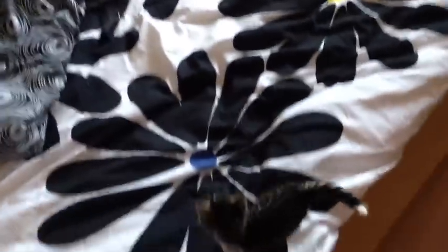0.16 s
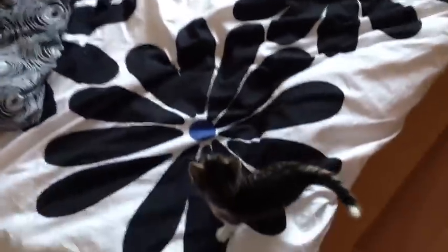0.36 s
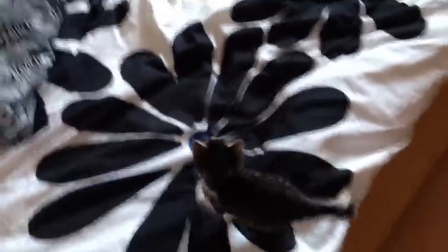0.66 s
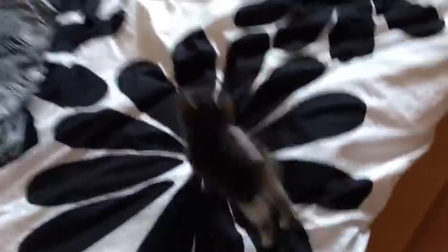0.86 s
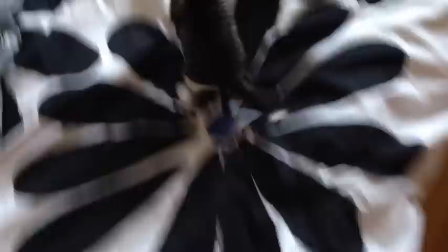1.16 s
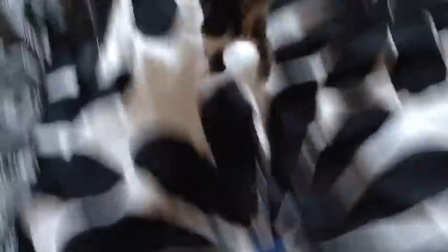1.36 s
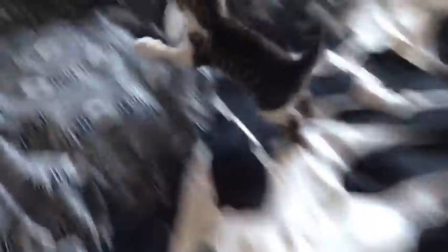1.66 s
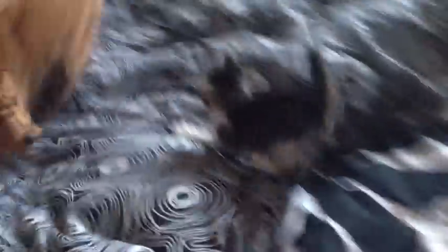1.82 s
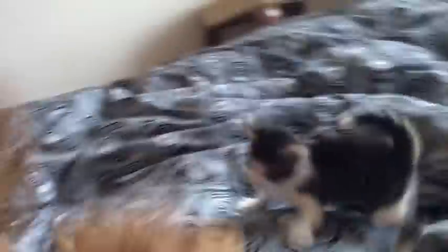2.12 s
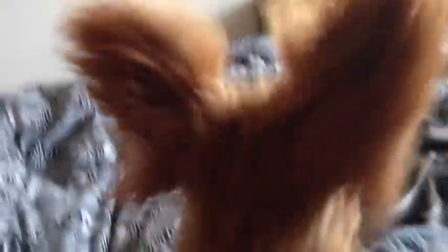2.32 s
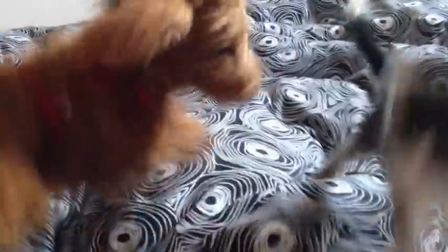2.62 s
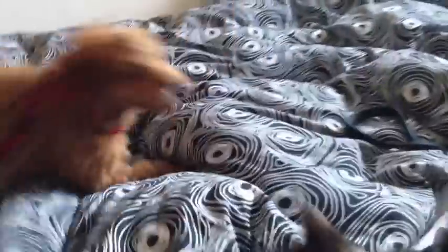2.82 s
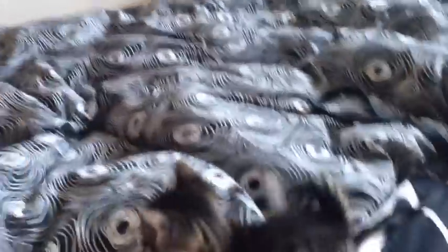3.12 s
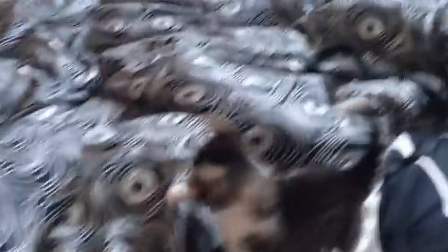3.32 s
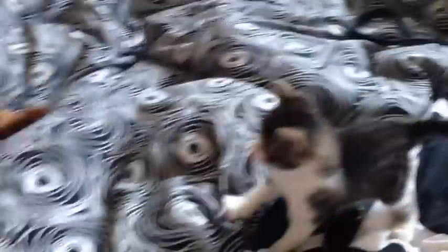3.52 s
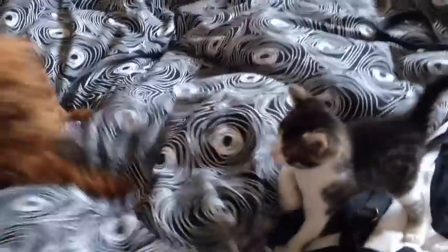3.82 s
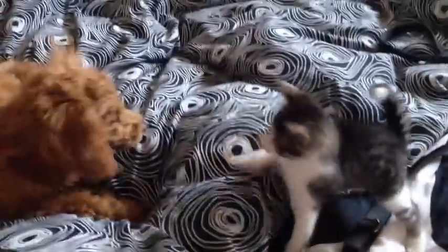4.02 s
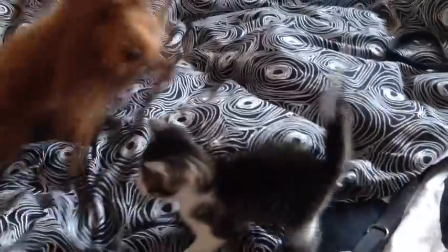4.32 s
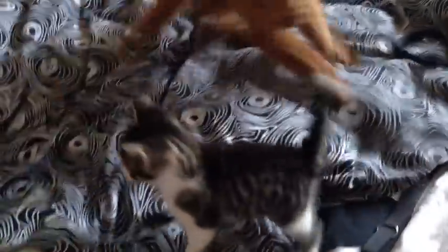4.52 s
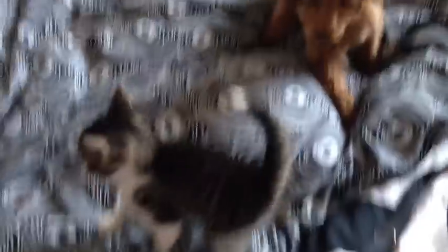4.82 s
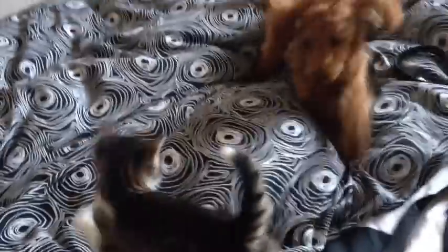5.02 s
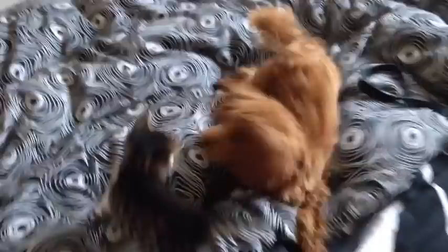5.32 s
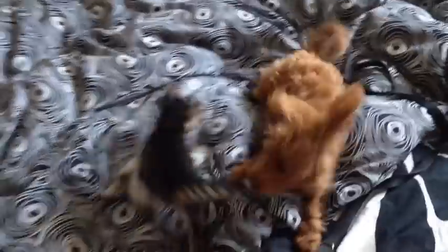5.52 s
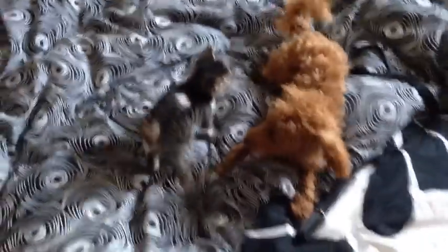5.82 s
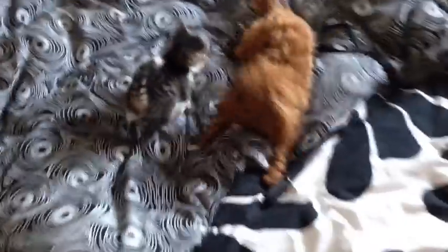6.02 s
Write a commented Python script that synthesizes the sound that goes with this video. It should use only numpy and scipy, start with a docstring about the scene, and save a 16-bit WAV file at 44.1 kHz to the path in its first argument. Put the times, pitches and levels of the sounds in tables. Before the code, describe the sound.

Close rustling of bedding and muffled pats open the scene, as a small dog and a kitten move over a duvet and knock a hard object. Heavier pounces follow, thumping the mattress while fur swishes and claws snap free of the cloth. The play softens, with a light clink, more clusters of paw landings and one brighter clink. A nearby phone picks it up with faint hiss and slight bedroom reverberation.

```python
"""A quiet bedroom, where a small dog and a kitten tumble on a bed close to a phone. Over a faint hiss,
fur and paws drag across the duvet: stick-slip friction rumbles in the padding and rasps on the cloth.
Paws land as damped thuds and pats, the heaviest heave the mattress, and claws snap free of the cloth.
Now and then two hard things are knocked and ring in their modes; the last clink has a bright attack.
The room answers each impact softly."""
import sys
import numpy as np
from scipy import signal
from scipy.fft import rfft, irfft, next_fast_len
from scipy.io import wavfile
from scipy.ndimage import uniform_filter1d, map_coordinates

SR = 44100
rng = np.random.default_rng(int(sys.argv[2]) if len(sys.argv) > 2 else 0)


def to_wav(s):
    """Save 16-bit WAV."""
    ch = np.atleast_2d(s).T  # columns
    pcm = np.round(np.clip(ch, -1, 1) * 32767)  # PCM
    wavfile.write(sys.argv[1], SR, pcm.astype(np.int16))


N = 271656


def amp(db):
    """Amplitude ratio of a level in decibels."""
    return 10 ** (np.asarray(db) / 20)


def unit(x):
    """Normalisation to rms 1."""
    return x / np.sqrt(np.mean(x ** 2) + 1e-20)


def along(points, hz):
    """Interpolation of (frequency, value) points on a logarithmic frequency axis."""
    f, values = np.transpose(points)
    return np.interp(np.log(hz + 1), np.log(f + 1), values)


def filtered(x, response):
    """Linear filtering: the spectrum is multiplied by a complex frequency response."""
    size = next_fast_len(len(x) + 8192)
    return irfft(rfft(x, size) * response(np.fft.rfftfreq(size, 1 / SR)), size)[:len(x)]


def resonance(centre_hz, width_hz):
    """Frequency response of a damped oscillator, with peak gain 1."""
    return lambda f: 1j * f * width_hz / (centre_hz ** 2 - f * f + 1j * f * width_hz)


def wobble(rate_hz):
    """Slow random modulation: a spline through rate_hz knots a second."""
    knots = rng.standard_normal(int(N * rate_hz / SR) + 4)
    return map_coordinates(knots, [np.arange(N) * rate_hz / SR])


def rustle(spectrum, slips_per_s, spread_db, slip_share, patchy_db):
    """Shot noise of slipping fibres over patchy Gaussian noise, coloured by a spectrum; rms 1."""
    cells = signal.stft(rng.standard_normal(N), nperseg=512)[2]
    patches = uniform_filter1d(rng.standard_normal(cells.shape), size=6, axis=0)
    patches = uniform_filter1d(patches, size=6, axis=1)
    noise = signal.istft(cells * amp(patchy_db * unit(patches)), nperseg=512)[1][:N]
    chance, size, sign = rng.random((3, N))
    slips = (chance < slips_per_s / SR) * amp(-spread_db * np.log(size + 0.0041)) * np.sign(sign - 0.5)
    mix = np.sqrt(1 - slip_share) * unit(noise) + np.sqrt(slip_share) * unit(slips)
    return unit(filtered(mix, lambda f: amp(along(spectrum, f))))


def contact(t60_s, attack_s, rough):
    """Force of an impact: one shove, then friction noise that decays exponentially."""
    t = np.arange(SR // 5) / SR
    shove = t / attack_s * np.exp(1 - t / attack_s)
    rub = rng.standard_normal(len(t)) * amp(-60 * t / t60_s) * (1 - np.exp(-t / attack_s))
    return shove + rough * rub


def add(track, start_s, sound, peak_db):
    """Superposition: a sound joins the track, scaled to a peak level."""
    start = round(start_s * SR)
    piece = sound[:len(track) - start]
    track[start:start + len(piece)] += amp(peak_db) * piece / np.max(np.abs(sound))


def hush():
    """Noise floor: room and microphone give a steady, coloured hiss."""
    # noise spectrum: frequency_hz, density_db
    spectrum = [(15, -64), (25, -35), (70, 18), (136, -13), (169, 10), (552, -10), (1450, -21), (2120, -7),
                (5730, -3.5), (14300, -5.5), (15500, -4.5)]
    return amp(-65) * rustle(spectrum, slips_per_s=100, spread_db=1, slip_share=0, patchy_db=1)


def room(x):
    """Reverberation: in the soft bedroom's diffuse tail each frequency decays at its own rate."""
    # reverberation times: frequency_hz, t60_s
    decay = [(200, 0.25), (2000, 0.53), (10000, 0.85)]
    hz, t, cells = signal.stft(rng.standard_normal(SR // 2), SR, nperseg=256)
    tail = signal.istft(cells * amp(-60 * t / along(decay, hz)[:, None]), SR, nperseg=256)[1]
    delayed = np.pad(x, (300, 0))
    return signal.fftconvolve(delayed, tail / np.linalg.norm(tail))[:N]


def drag_gain(stir_db, layer, sag_db_per_s, fade_db_per_s):
    """Incoherent sources add in power: the stir plus each drag, which swells, sags and fades."""
    # drags of fur and paws: start_s, swell_s, held_s, weight_db, rub_db, swish_db
    drags = [(0, 0.0011, 0.15, -54.5, -58, -81), (.22, 0.049, 0.057, -66, -58, -64.5),
             (0.383, 0.002, 0.12, -75, -58.5, -61), (.65, 0.052, 0.067, -72, -59.5, -64),
             (.79, 0.03, 0.072, -56.5, -72, -64.5), (.99, 0.01, 0.025, -45, -44.5, -65),
             (1.124, 0.004, 0.027, -45.5, -74, -63), (1.23, 0.03, 0.16, -54, -62.5, -63),
             (1.37, 0.063, 0.058, -58, -59.5, -57), (1.6, 0.039, 0.18, -46, -57.5, -80),
             (1.77, 0.015, 0.051, -50.5, -71, -79), (1.845, 0.02, 0.21, -39, -45.5, -53.5),
             (2.041, 0.023, 0.092, -43, -57, -61), (2.249, 0.015, 0.023, -49, -42.5, -62),
             (2.29, 0.049, 0.12, -46, -49.5, -53), (2.596, 0.014, 0.0098, -41, -54, -51),
             (2.71, 0.053, 0.052, -47.5, -43.5, -50), (2.82, 0.043, 0.078, -42, -47.5, -77),
             (3.0, 0.012, 0.0083, -48, -68, -81), (3.15, 0.036, 0.14, -50.5, -52, -63),
             (3.455, .02, 0.018, -60, -66, -69), (3.485, 0.0018, 0.032, -70, -55, -62),
             (3.64, 0.054, 0.11, -83, -54.5, -60), (3.859, 0.0069, 0.19, -56.5, -59, -71),
             (4.19, 0.06, 0.21, -56, -59, -64), (4.421, 0.046, 0.017, -56, -79, -80),
             (4.55, 0.0089, 0.027, -60, -57, -74), (4.585, 0.016, 0.11, -41, -51.5, -60),
             (4.84, 0.01, 0.03, -69, -62, -70), (5.112, 0.008, 0.05, -51.5, -55.5, -64),
             (5.2, 0.026, 0.14, -54, -59.5, -64), (5.27, 0.07, 0.11, -63, -71, -59.5),
             (5.47, 0.075, 0.22, -64.5, -60.5, -59), (5.67, 0.023, 0.11, -59, -59, -78),
             (6.04, 0.016, .11, -62, -59, -63.5)]
    column = ("weight", "rub", "swish").index(layer)
    power = amp(2 * stir_db)
    t = np.arange(SR // 2) / SR
    for start_s, swell_s, held_s, *levels_db in drags:
        sag_db = sag_db_per_s * np.clip(t - swell_s, 0, held_s)
        fade_db = fade_db_per_s * np.clip(t - swell_s - held_s, 0, None)
        drag = np.clip(t / swell_s, 0, 1) * amp(levels_db[column] - sag_db - fade_db)
        start = round(start_s * SR)
        power[start:start + len(t)] += drag[:N - start] ** 2
    return np.sqrt(power)


def duvet():
    """Stick-slip friction: shifting weight rumbles, rubbing rasps the cloth, fast strokes swish."""
    # ceaseless stir of the animals: time_s, weight_db, rub_db
    stir = [(0.0, -56, -63), (0.74, -72, -68.5), (1.25, -53.5, -58), (1.63, -65.5, -58), (1.97, -52, -54),
            (2.42, -55, -52.5), (2.88, -45, -53), (3.48, -69, -67), (4.58, -61.5, -58), (4.84, -62.5, -65),
            (5.13, -60, -65.5), (5.32, -53, -52.5), (5.59, -59, -61), (5.76, -71, -75), (5.99, -64, -68),
            (6.16, -54, -56)]
    # rumble of the padding: frequency_hz, density_db
    padding = [(15, -51), (25, -7), (97, -13.5), (130, -9), (214, -6), (257, -6), (607, -8), (845, -14.5),
               (2000, -22), (2600, -41), (4400, -120)]
    # bed frame modes that hum under the weight: pitch_hz, width_hz, gain_db
    frame_modes = [(153.4, 21, 10.5), (218, 17, 1.5), (358, 39, -6)]
    # rasp of the cloth: frequency_hz, density_db
    cloth = [(350, -5.5), (600, -3.5), (1120, -3), (2390, -3.5), (2930, -3), (3210, -4.5), (3940, -5.5),
             (9000, -19), (11700, -28), (19800, -120)]
    # swish of fast strokes: frequency_hz, density_db
    swish_spectrum = [(2940, -14), (5000, 0), (5900, 0), (7070, -5.5), (14500, -13.5), (15500, -44)]
    time_s, *levels_db = np.transpose(stir)
    weight_db, rub_db = [np.interp(np.arange(N) / SR, time_s, db) for db in levels_db]
    jerk = wobble(28)  # strokes come in small starts that every layer shares
    rumble = amp(1.8 * jerk + 1.5 * wobble(70))
    rumble *= rustle(padding, slips_per_s=200, spread_db=2, slip_share=0.12, patchy_db=1.8)
    frame = lambda f: 1 + sum(amp(db) * resonance(hz, width)(f) for hz, width, db in frame_modes)
    rumble = unit(filtered(rumble, frame))
    rasp = rustle(cloth, slips_per_s=1100, spread_db=2, slip_share=0.076, patchy_db=3)
    swish = rustle(swish_spectrum, slips_per_s=1600, spread_db=2, slip_share=0.26, patchy_db=6)
    rumble *= drag_gain(weight_db, "weight", sag_db_per_s=32, fade_db_per_s=800)
    rasp *= amp(0.47 * jerk) * drag_gain(rub_db, "rub", sag_db_per_s=49, fade_db_per_s=460)
    swish *= amp(jerk) * drag_gain(rub_db - 12, "swish", sag_db_per_s=37, fade_db_per_s=190)
    return rumble + rasp + swish


def fur_strokes():
    """Friction on a periodic surface: fur crossing the weave at even speed gives narrow-band noise."""
    # long strokes: start_s, end_s, centre_hz, width_hz, level_db
    strokes = [(0.403, 0.446, 2920, 180, -60), (0.67, 0.72, 5760, 600, -63.5),
               (1.296, 1.324, 3850, 250, -57.5), (1.337, 1.39, 2860, 200, -69),
               (1.426, 1.461, 3080, 500, -55.5), (1.428, 1.455, 5030, 400, -58),
               (1.433, 1.487, 5850, 400, -61.5), (2.289, 2.36, 3770, 1490, -46),
               (2.757, 2.823, 5760, 1190, -73), (2.796, 3.006, 2540, 594, -50),
               (2.798, 3.02, 4230, 600, -55), (3.63, 3.695, 870, 350, -62)]
    out = np.zeros(N)
    t = np.arange(SR // 2) / SR
    for start_s, end_s, centre_hz, width_hz, level_db in strokes:
        length_s = end_s - start_s
        swell = np.interp(t, [0, 0.015, length_s, length_s + 0.033], [0, 1, 1, 0])
        band = unit(filtered(rng.standard_normal(len(t)), resonance(centre_hz, width_hz)))
        out[round(start_s * SR):][:len(t)] += amp(level_db) * swell * band
    return out


def struck(blows, modes, t60_s, rough, crack_db):
    """Modal vibration: each contact drives the same modes, favouring those near its brightest pitch."""
    fall_db_per_octave = 7
    out = np.zeros(N)
    for start_s, peak_db, bright_hz in blows:
        gains_db = [db - fall_db_per_octave * abs(np.log2(hz / bright_hz)) for hz, _, db in modes]
        gains_db = gains_db + rng.standard_normal(len(modes))  # no two blows land on the same spot
        body = lambda f: sum((-1) ** k * amp(gains_db[k]) * resonance(hz, width_hz)(f)
                             for k, (hz, width_hz, _) in enumerate(modes))
        crack = lambda f: amp(crack_db) / (1 + 1j * f / 7000) ** 3
        force = contact(t60_s, attack_s=0.00005, rough=rough)
        add(out, start_s, filtered(force, lambda f: body(f) + crack(f)), peak_db)
    return out


def knocks():
    """Impact on a hard object: a short, rough contact excites its modes in a dry knock."""
    # blows on the object: start_s, peak_db, bright_hz
    blows = [(.387, -44, 5500), (.39, -41, 1520), (0.9889, -26, 3600), (0.9934, -31, 2410),
             (1.124, -38, 1480), (1.1245, -38.5, 5700), (1.127, -37.5, 1620), (1.1393, -45, 900),
             (1.145, -46, 1500), (1.224, -33.5, 1500), (1.226, -47, 3800), (1.243, -37.5, 1480),
             (1.2485, -48, 1000), (1.288, -38.5, 5000), (1.292, -41, 4460)]
    # its modes: pitch_hz, width_hz, gain_db
    modes = [(525, 45, 23.5), (1390, 170, 14), (1790, 160, 9), (2460, 71, 10.5), (2940, 150, 8),
             (3900, 560, 3.5), (4300, 250, 5), (4860, 230, 4), (5550, 380, 6.5), (6050, 590, 4)]
    return struck(blows, modes, t60_s=0.067, rough=0.48, crack_db=-11)


def clinks():
    """Impact on a hollower object: a longer contact and a lightly damped low mode let it ring on."""
    # blows on the object: start_s, peak_db, bright_hz
    blows = [(3.4878, -42, 3000), (3.4945, -35, 2620), (3.507, -46, 2600), (3.512, -51, 1300),
             (5.656, -38, 900), (5.661, -51, 2000), (5.668, -28.5, 1680), (5.6743, -33, 2000),
             (5.683, -39, 600), (5.694, -50, 1300), (5.712, -43, 1500), (5.742, -55, 1900)]
    # its modes: pitch_hz, width_hz, gain_db
    modes = [(156.5, 10, 34), (490, 90, 17), (1285, 55, 12), (1840, 120, 10), (1994, 200, 14),
             (2950, 250, 9), (3940, 250, 5), (5400, 450, 7), (6100, 500, 7), (7400, 400, 5), (9300, 400, 3)]
    return struck(blows, modes, t60_s=0.17, rough=0.13, crack_db=-17)


def sharp_ticks():
    """Brief pulses have broad spectra: claw snaps, and the bright attack of the last clink."""
    # sharp ticks: start_s, peak_db, centre_hz
    ticks = [(.25, -46, 2300), (.2695, -44, 2820), (.3915, -38, 3000), (.9028, -52, 4020),
             (1.7562, -41, 2430), (1.94, -33, 2950), (1.971, -27, 2950), (2.0567, -20, 2950),
             (2.0744, -33, 2440), (2.1804, -36.5, 3220), (2.2495, -36, 3500), (2.255, -29, 3800),
             (2.2637, -31, 3800), (2.27, -30, 3000), (2.2742, -20, 3500), (2.6071, -21.5, 1810),
             (2.7437, -41, 4030), (3.16, -43, 2500), (3.2235, -40, 2260), (4.142, -46, 2770),
             (4.325, -43, 800), (4.4198, -39, 4400), (4.4583, -38.5, 3150), (4.5585, -46, 5000),
             (4.6215, -31, 3300), (4.6228, -27, 1100), (4.654, -36, 1200), (5.118, -40, 900),
             (5.124, -40, 1400), (5.1363, -34, 3700), (5.1772, -39, 1900), (5.178, -39, 800),
             (5.1795, -41, 2050), (5.25, -42, 2260), (5.3755, -42, 2800), (5.55, -44, 1500),
             (5.5855, -39, 2400), (5.6665, -37, 5900), (5.6695, -36, 4000), (5.671, -39, 6000)]
    out = np.zeros(N)
    for start_s, peak_db, centre_hz in ticks:
        width_hz = centre_hz * amp(0.4 * (peak_db + 37))  # louder ticks are broader
        band = lambda f: resonance(centre_hz, width_hz)(f) ** 2 / (1 + 1j * f / 9500) ** 2
        force = contact(t60_s=0.006, attack_s=0.00003, rough=0.18)
        add(out, start_s, filtered(force, band), peak_db)
    return out


def mattress_heaves():
    """Critical damping: the mattress yields to the heaviest landings as a mass on a spring."""
    # heavy landings: start_s, peak_db
    heaves = [(1.0, -44), (1.13, -39), (1.74, -36), (2.04, -40), (2.262, -26), (2.601, -41), (2.858, -30),
              (4.59, -36), (4.67, -32), (5.669, -38)]
    natural_hz = 45.3
    out = np.zeros(N)
    for start_s, peak_db in heaves:
        force = contact(t60_s=0.34, attack_s=0.0021, rough=5.2)
        add(out, start_s, filtered(force, lambda f: 1 / (1 + 1j * f / natural_hz) ** 2), peak_db)
    return out


def paw_pats():
    """Contact time limits bandwidth: the more slowly a paw slaps the cloth, the duller the burst."""
    # slaps on the cloth: start_s, peak_db, centre_hz, t60_s
    pats = [(1.708, -36, 710, 0.16), (1.851, -30.5, 700, 0.17), (1.858, -44, 1500, .1),
            (2.054, -28, 2330, 0.074), (2.065, -25.5, 700, 0.065), (2.073, -28, 756, 0.045),
            (2.2493, -27, 484, .05), (2.2545, -31, 680, 0.15), (2.2574, -22, 423, .03),
            (2.2635, -21.5, 444, 0.14), (2.274, -27, 433, 0.024), (2.2815, -28, 890, 0.035),
            (2.315, -30.5, 597, 0.04), (2.818, -41, 715, 0.07), (2.823, -31.5, 880, 0.077),
            (3.013, -38.5, 900, 0.037), (3.106, -34.5, 330, 0.084), (3.11, -37, 1080, 0.094),
            (3.872, -42, 790, 0.087), (3.942, -45.5, 690, 0.036), (4.147, -44.5, 920, 0.06),
            (4.233, -52, 1110, .03), (4.247, -42.5, 1000, 0.029), (4.258, -42, 800, 0.062),
            (4.378, -41, 1900, .03), (4.384, -39.5, 810, 0.079), (4.4465, -42, 1510, 0.073),
            (4.518, -40.5, 707, 0.12), (4.53, -39, 800, 0.05), (4.593, -42, 700, 0.11),
            (4.631, -34, 900, 0.21), (4.657, -39, 980, 0.23), (4.67, -34, 850, 0.12),
            (5.113, -51, 1190, 0.2), (5.133, -38, 1140, 0.053), (5.19, -40.5, 497, .03),
            (5.3, -39, 600, 0.045), (5.334, -40, 1090, 0.04), (5.3395, -35, 1170, 0.032),
            (5.411, -38.5, 980, 0.15), (5.527, -40, 700, 0.056), (5.585, -40, 1150, 0.2),
            (5.977, -51.5, 1230, 0.18), (6.047, -54, 2900, 0.073)]
    out = np.zeros(N)
    for start_s, peak_db, centre_hz, t60_s in pats:
        cloth = lambda f: (resonance(centre_hz, 0.9 * centre_hz)(f) + 0.047) / (1 + 1j * f / 5000) ** 2
        force = contact(t60_s, attack_s=0.099 / centre_hz, rough=0.51)
        add(out, start_s, filtered(force, cloth), peak_db)
    return out


def paw_thuds():
    """Damped resonance: the padding rings briefly as a paw sinks into it."""
    # paw landings: start_s, peak_db, pitch_hz
    thuds = [(0.3202, -42, 365), (0.326, -32, 340), (.327, -46.5, 550), (0.346, -39, 366),
             (.361, -40.5, 365), (.818, -48, 412), (0.841, -58, 304), (.989, -35, 585), (1.119, -37.5, 493),
             (1.222, -45, 543), (1.607, -43.5, 184), (1.659, -41, 345), (1.71, -31.5, 394),
             (1.85, -35.5, 170), (1.875, -33, 340), (1.905, -38, 307), (1.962, -34, 353), (2.104, -43, 356),
             (2.053, -30.5, 334), (2.248, -42, 150), (2.272, -31, 390), (2.308, -39, 400),
             (2.386, -41, 170), (2.597, -44, 306), (2.661, -42, 160), (2.817, -32.5, 524),
             (2.847, -33.5, 215), (2.86, -38.5, 144), (2.874, -29, 214), (2.886, -35, 150),
             (2.895, -41, 219), (2.921, -40, 182), (2.95, -41, 185), (3.007, -37.5, 141), (3.509, -51, 155),
             (3.864, -47, 235), (3.937, -41, 342), (4.063, -48, 267), (4.141, -51, 352), (4.151, -56, 284),
             (4.253, -55, 261), (4.378, -47, 226), (4.519, -48, 352), (4.551, -53, 480), (4.599, -42, 295),
             (4.621, -35, 456), (4.609, -37, 235), (4.633, -34.5, 328), (4.667, -36, 395),
             (4.676, -41, 300), (4.688, -39, 250), (4.85, -52, 517), (5.127, -40.5, 324),
             (5.246, -42.5, 355), (5.26, -44, 527), (5.665, -37, 486), (5.683, -36.5, 156),
             (5.976, -52, 530), (6.048, -52, 540)]
    out = np.zeros(N)
    for start_s, peak_db, pitch_hz in thuds:
        width_hz = 0.4 * pitch_hz * (pitch_hz / 320) ** 0.19  # deeper thuds ring more narrowly
        force = contact(t60_s=0.081, attack_s=0.00042, rough=0.82)
        add(out, start_s, filtered(force, lambda f: resonance(pitch_hz, width_hz)(f) ** 2), peak_db)
    return out


def scene():
    """Superposition: impacts and their reverberation sound over the friction and the noise floor."""
    impacts = paw_thuds() + mattress_heaves() + paw_pats() + sharp_ticks() + knocks() + clinks()
    return (hush() + amp(-9) * room(impacts) + duvet() + fur_strokes() + impacts)[None]


def record(dry):
    """Band limiting: the phone's microphone rolls off the deep bass and cuts the highest treble."""
    bass_hz, top_hz = 125, 15400
    high_pass = lambda f: -(f / bass_hz) ** 2 / (1 + 1.4j * f / bass_hz - (f / bass_hz) ** 2)
    return filtered(dry[0], lambda f: (high_pass(f) ** 2 + 0.012) * (f < top_hz))[None]


dry = scene()
out = record(dry)
to_wav(out)
```